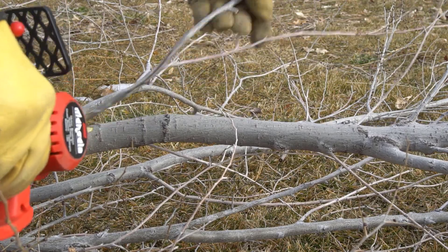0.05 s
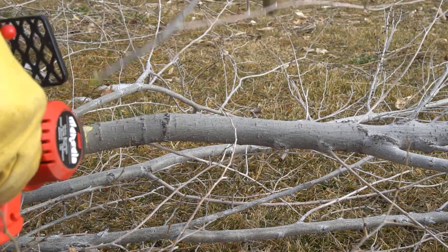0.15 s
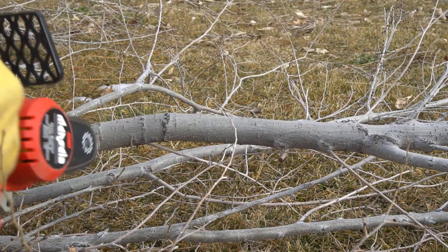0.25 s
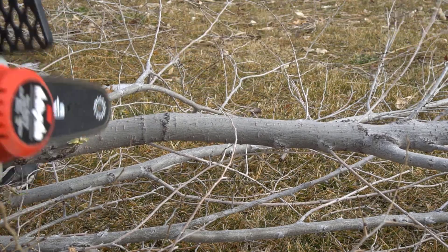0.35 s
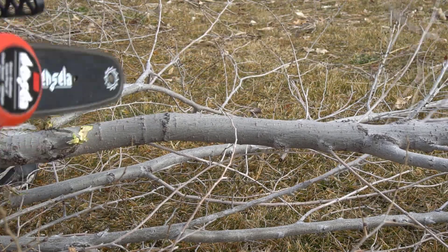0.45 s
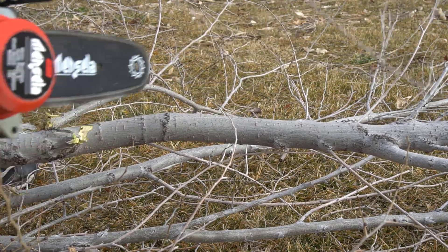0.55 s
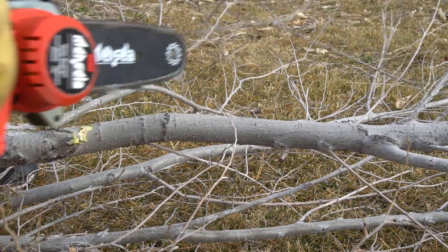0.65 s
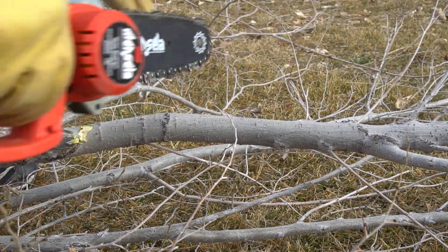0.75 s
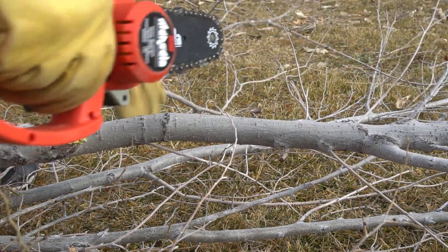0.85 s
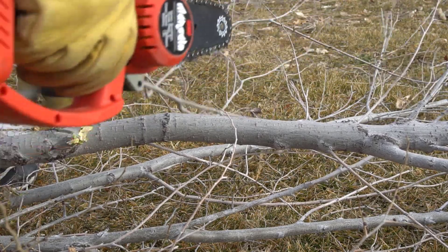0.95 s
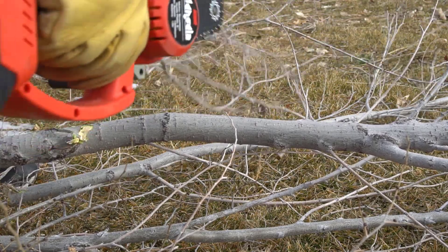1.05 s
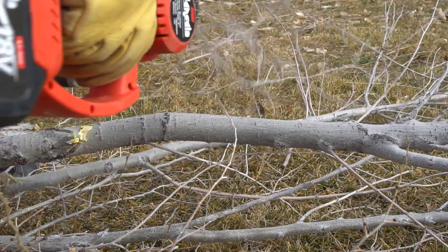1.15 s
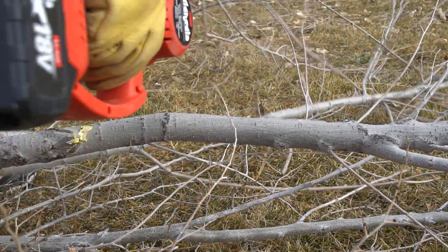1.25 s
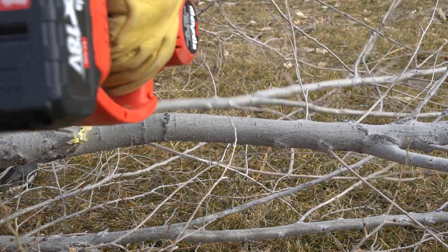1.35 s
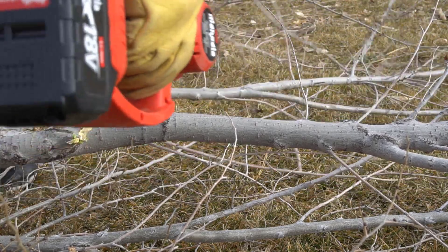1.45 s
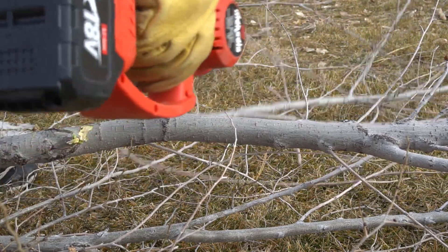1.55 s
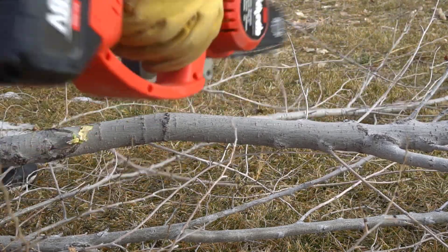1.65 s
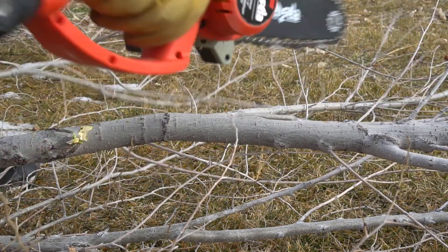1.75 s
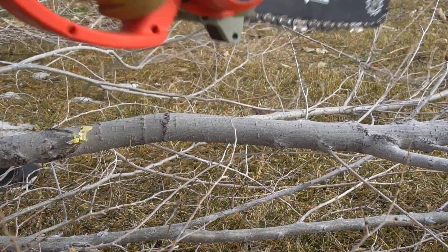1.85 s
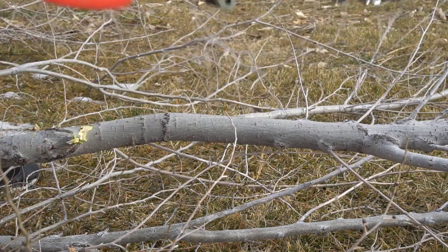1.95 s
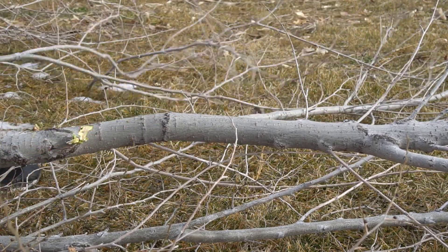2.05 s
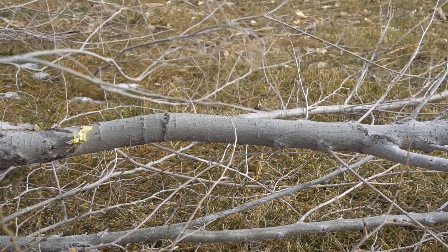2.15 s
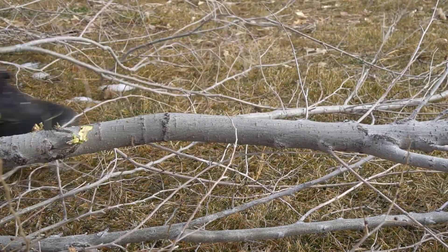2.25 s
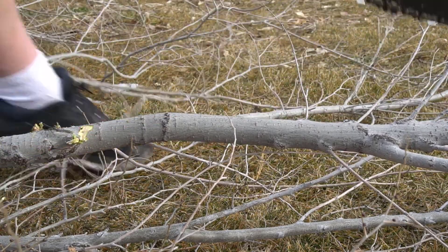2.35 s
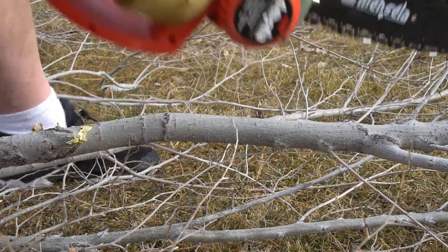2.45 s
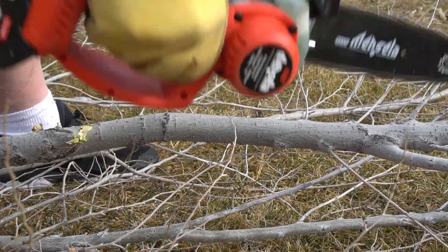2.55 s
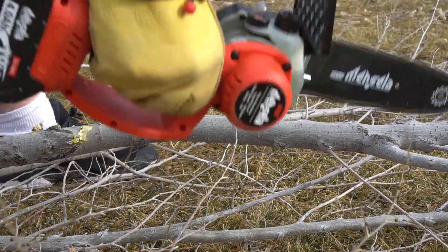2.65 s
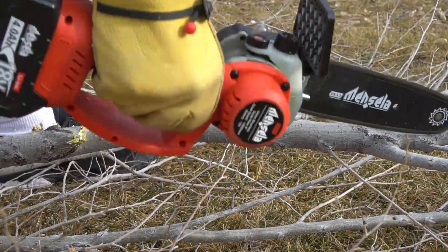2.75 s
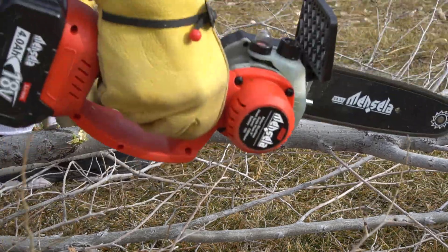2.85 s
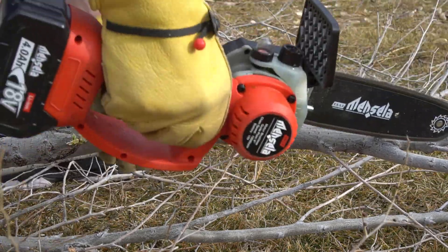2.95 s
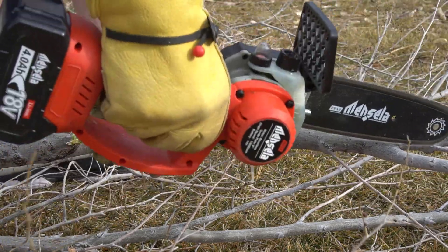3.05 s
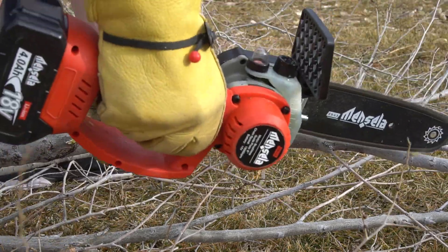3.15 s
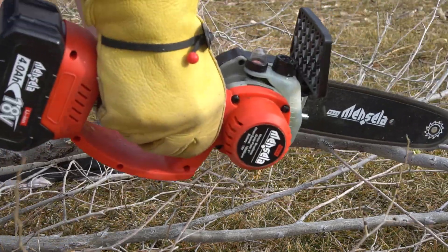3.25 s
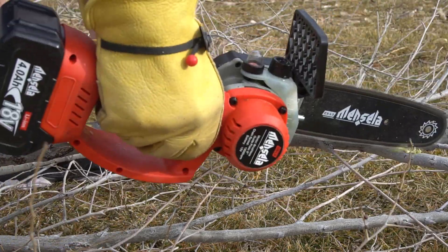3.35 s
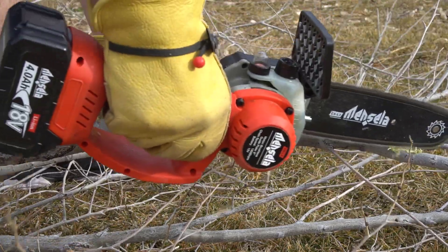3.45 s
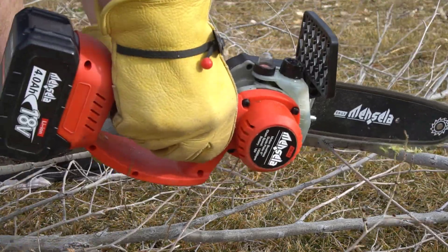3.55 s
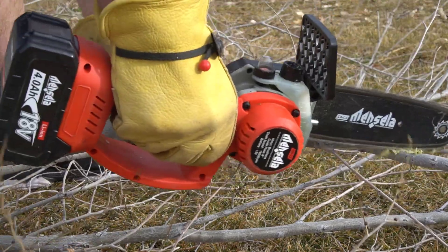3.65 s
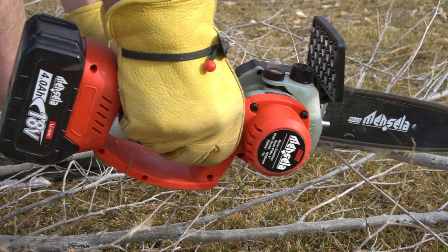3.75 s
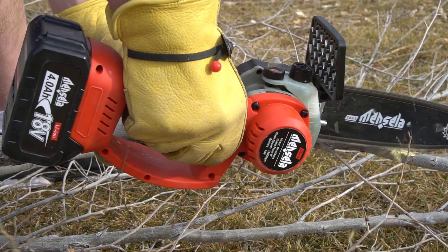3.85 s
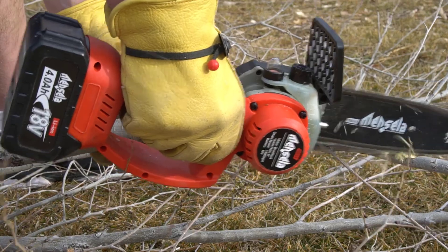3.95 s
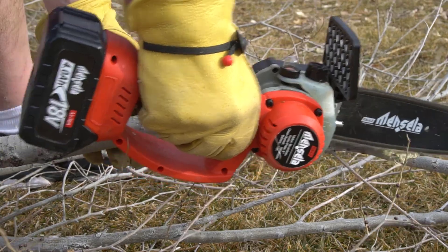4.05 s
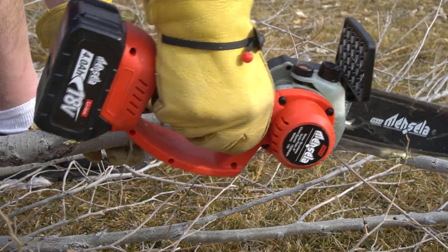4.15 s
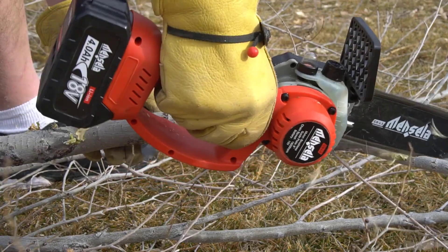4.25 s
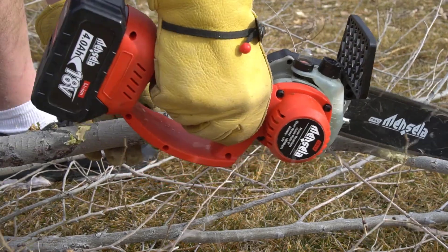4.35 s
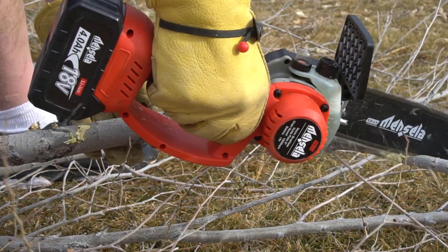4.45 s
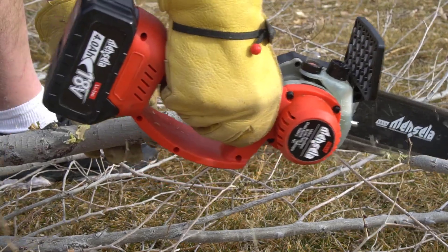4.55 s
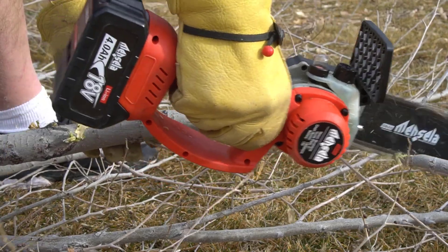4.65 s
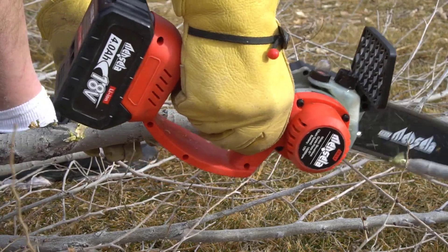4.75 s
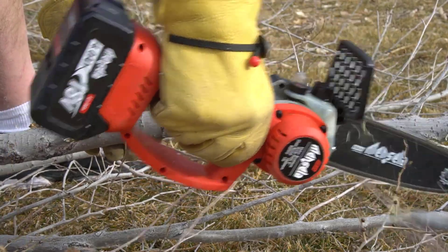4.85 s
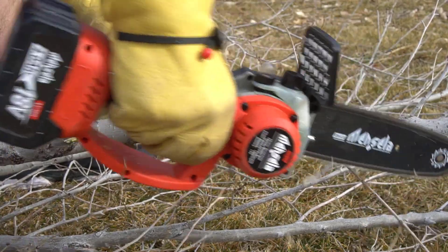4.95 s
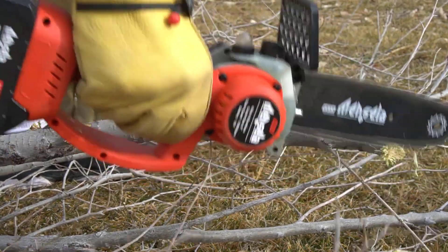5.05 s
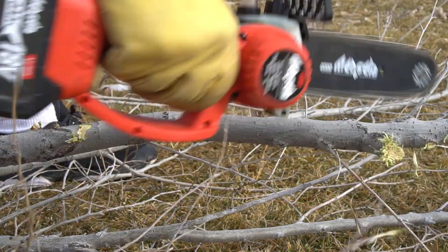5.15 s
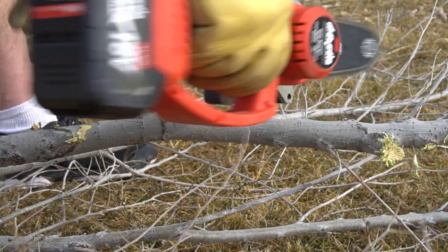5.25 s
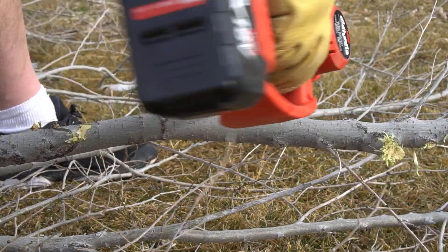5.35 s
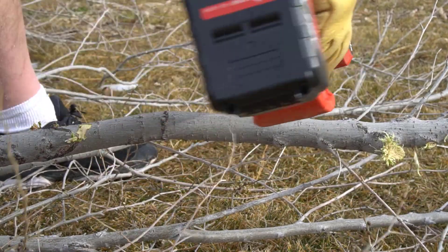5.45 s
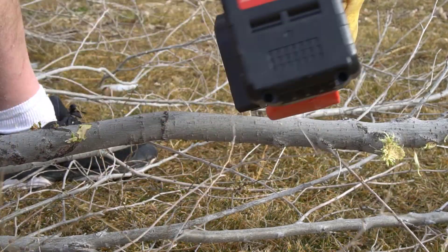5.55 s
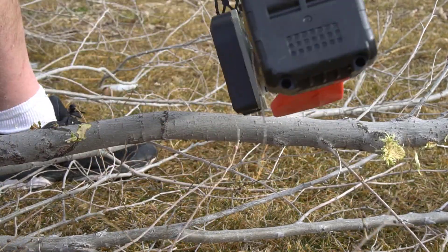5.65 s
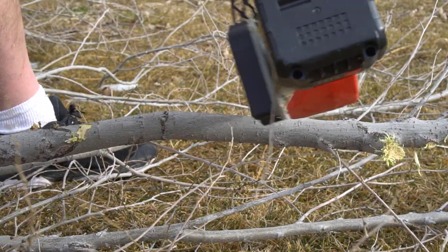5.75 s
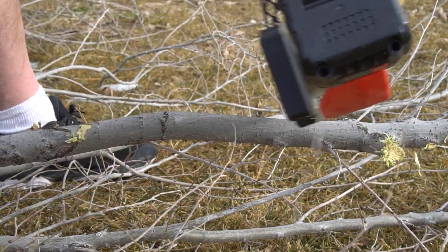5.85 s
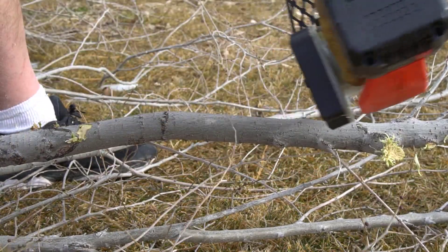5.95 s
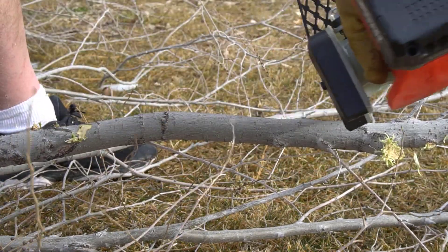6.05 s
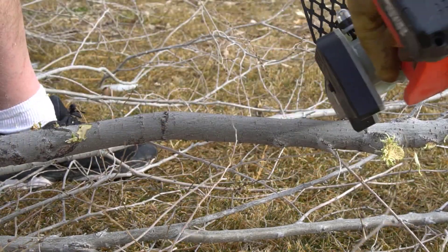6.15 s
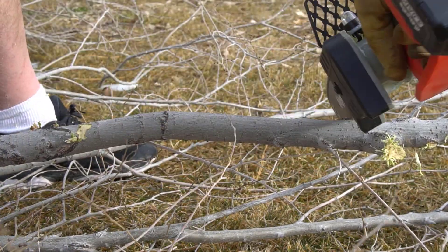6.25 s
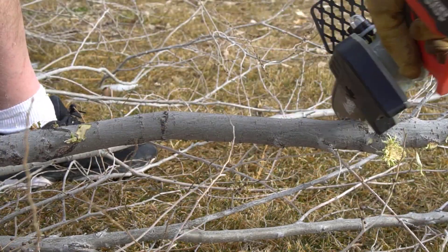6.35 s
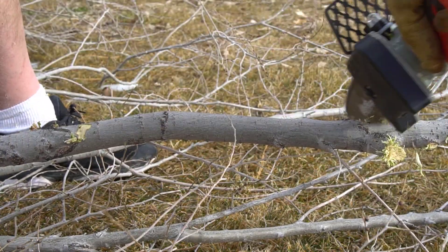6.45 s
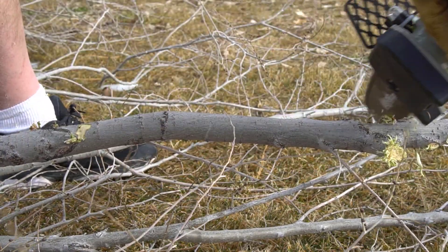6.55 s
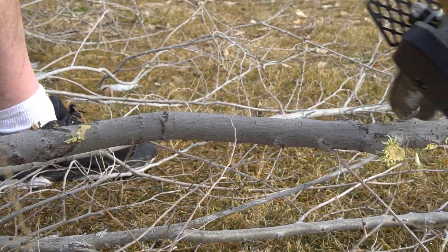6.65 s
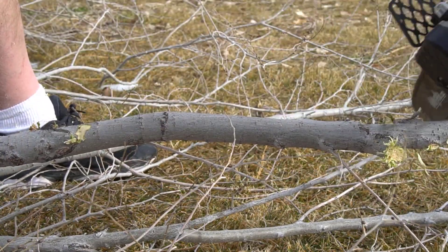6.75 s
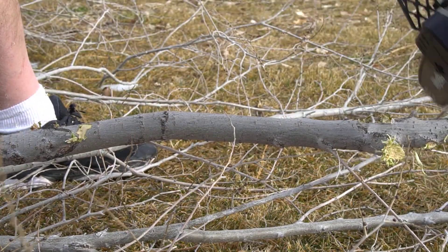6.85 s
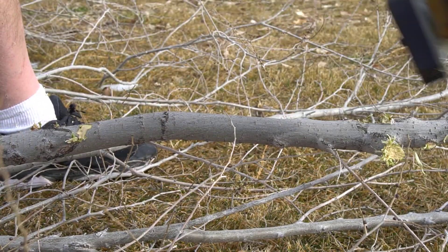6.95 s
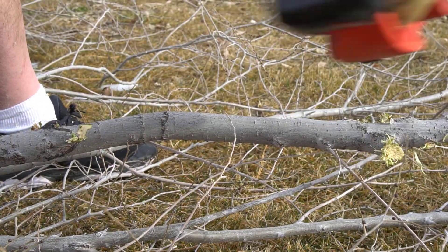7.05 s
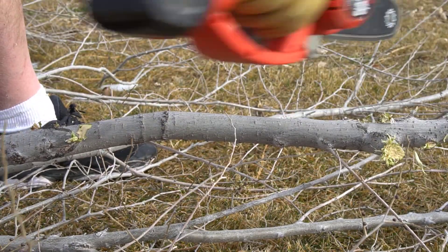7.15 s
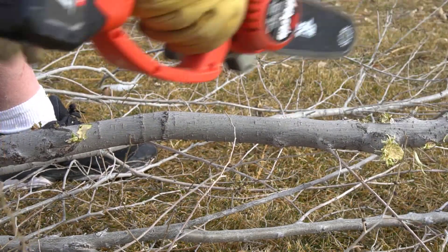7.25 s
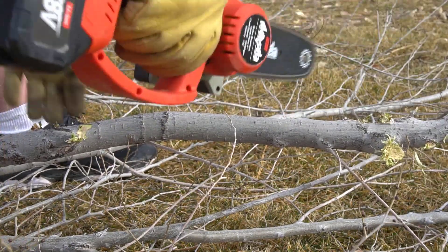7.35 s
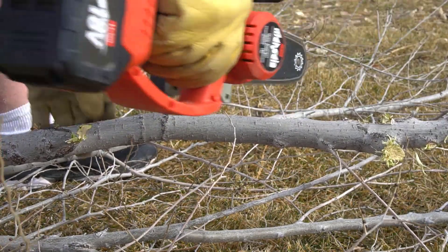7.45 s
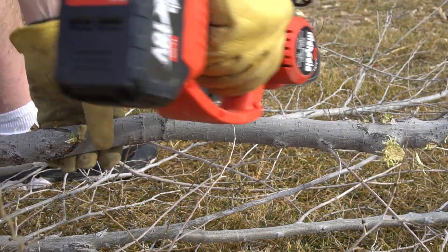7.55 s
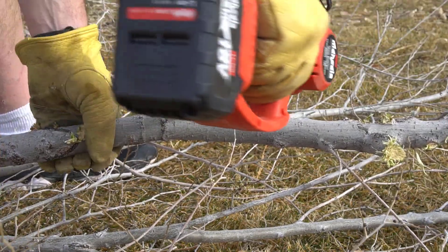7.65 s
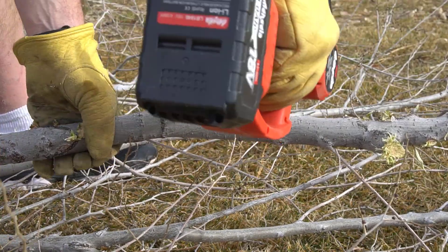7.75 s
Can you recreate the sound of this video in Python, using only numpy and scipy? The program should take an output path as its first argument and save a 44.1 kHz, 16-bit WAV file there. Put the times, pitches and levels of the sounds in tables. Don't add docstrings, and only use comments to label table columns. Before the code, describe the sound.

A small battery chainsaw runs very close in an open outdoor place, its chain rattling and sizzling on the steel bar, housing drumming, motor and gears whining. At about 0.4 s power is released; pitch and level fall quickly and the chain stops near 0.9 s with small clicks. Until 2.5 s it is much quieter: dry twigs rustle, scrape and crackle, with a few light snaps from 1.2 s, over low breeze and far traffic drone. A sharp click at 2.47 s is followed by the chain jerking into motion, its pitch climbing until about 3.5 s. From there to 4.8 s it cuts under load, slightly lower and rough, fluttering as teeth bite and skip. Near 5 s it rises to free speed, bright and steady. Around 6.3-6.6 s a knock and slight pitch sag mark a second stem, then it runs freely, still going at the end, 7.8 s.

```python
import sys
import numpy as np
from scipy import signal
from scipy.fft import rfft, irfft, next_fast_len
from scipy.io import wavfile
from scipy.ndimage import uniform_filter1d, map_coordinates

SR = 44100
rng = np.random.default_rng(int(sys.argv[2]) if len(sys.argv) > 2 else 0)


def ratio(d):
    e = np.asarray(d, float) / 20
    return 10 ** e


def master(y):
    cut = np.clip(np.atleast_2d(y).T, -1, 1)
    pcm = np.round(cut * 32767)
    wavfile.write(sys.argv[1], SR, pcm.astype(np.int16))


N = 344421

FREE_HZ = 282
STOP_S, START_S = .91, 2.507

# t/s, f/Hz
DRIVEN_SPEED = [
    [(0, 266), (.2, 280.7), (.3, 283.3), (.4, 279)],
    [(2.52, 68), (3.12, 188), (3.36, 227), (3.42, 247), (3.5, 243), (3.6, 260), (4.78, 262), (4.93, 280.5),
     (5.05, 282.3), (5.3, 280.3), (5.8, 283.5), (6.13, 283), (6.3, 276), (6.62, 274), (6.72, 281.3),
     (7.3, 282.6), (7.81, 282.5)],
]
# t/s, f/Hz
COASTING_SPEED = [(.62, 209), (0.861, 36), (.91, 8.9), (2.491, 9.1), (2.498, 61)]
# t/s, nearness/dB, vents toward the viewer/0-1, grip off the housing/0-1, left-right/dB
HOLD = [(0, -25.5, 0.7, 0.44, 1), (.15, -25.5, 0.6, 0.9, 1), (.4, -27, 0.9, 0, 1), (.55, -27, 1, 0.67, 1),
        (2.6, -28, .4, 0.67, -1.5), (3.0, -24.5, 0.25, 0.78, -1.5), (3.45, -25.5, 0.2, 0.32, -2),
        (3.8, -25.5, 0, 0.33, -2.5), (4.3, -28.5, 0, 0.38, -3), (4.85, -27, 0.04, 0.46, -2.5),
        (5.2, -27, 0.5, 0, -1.5), (5.45, -27.5, 0.54, 0.8, -1), (5.72, -27, 0.46, 0.8, -.3),
        (6.1, -26, 0.52, 0.44, -1), (6.8, -28, 0.43, 0.16, -5.5), (7.1, -27, 0.38, 0.17, -3),
        (7.45, -29, 0.92, 0.38, -1), (7.81, -25, 0.3, 0.75, -0.5)]
# level over nearness/dB, change for vents/dB, change for loose grip/dB,
# power of speed driven/1, power of speed coasting/1, start jerk/dB
CHAIN_PARTS = [
    (-8.5, 1, 9.5, 0.18, 1.4, 3),
    (-0.5, 0.5, -0.66, 0.15, 2, -1),
    (2.5, -1.5, -2.3, 0.15, 2.05, 1.5),
    (-0.5, 9.5, -0.44, 0.62, 2.7, 2),
]
# t/s, level/dB, length/s
SKIPS = [(0.43, -4.5, .016), (.681, -4, .019), (0.74, -2, .012), (2.725, -1, 0.027), (2.847, 2.5, .013),
         (3.255, -3.5, .018), (3.49, -3, 0.042), (3.562, -4, 0.052), (3.705, -6, 0.031), (4.023, -8, 0.037),
         (4.101, -5.5, 0.013), (4.205, -3, .015), (4.227, -3.2, .039), (4.257, -0.5, 0.028),
         (4.453, -4.5, 0.012), (4.548, 0, .038), (4.69, -8.5, 0.014), (4.715, 0, 0.028),
         (4.81, -2.8, 0.042), (5.537, 0, 0.04), (6.28, 20, .009), (6.48, -2.5, 0.02), (6.593, -2.5, 0.026),
         (6.94, -7.5, 0.027), (7.56, -1, 0.034)]
# t/s, level/dB
BITES = [(.7, 1), (2.7, 5), (2.764, 3.5), (3.868, 1.5), (4.035, 6), (4.078, 1), (4.168, 2.5), (4.196, 3.4),
         (4.25, 5), (4.305, 4.5), (4.336, 2.5), (4.388, 6.5), (4.439, 5), (4.484, 0.5), (4.521, 2.8),
         (4.585, 2.5), (4.696, 5), (4.763, 1), (4.846, 0.5), (6.532, 1), (6.585, 3.5), (7.373, 1.5),
         (7.468, 2.5)]
# f/Hz, width/Hz
DRUM_NOTES = [
    (1075, 100),
    (1280, 150),
]
# f/Hz, level per Hz/dB
STEEL_COLOUR = [(150, -28), (350, -25), (630, -14.5), (760, -19.5), (1200, -7.5), (1560, -3.5),
                (1850, -7.5), (3600, -5.5), (6300, -4.5), (13700, -1.5), (15600, -5.5), (16000, -58)]
# f/Hz, width/Hz, level/dB
BAR_NOTES = [(779, 54, 9.5), (1993, 150, 7), (2830, 450, 3.5), (3630, 88, 3), (4940, 240, 0.5),
             (5310, 220, 2), (7070, 130, 3), (8450, 390, 7.5), (9300, 630, 6), (10210, 280, 4.5),
             (13000, 600, 1.5), (13700, 450, 0)]
# f/Hz, width/Hz, level/dB
BAR_SIDE = [
    (1450, 740, -7),
    (8050, 950, 1.5),
]
# f/Hz, width/Hz, level/dB
GROUND_DIPS = [
    (615, 130, -12),
    (1570, 260, -7),
]
# f/Hz, likeness/0-1
CHAIN_ALIKE = [(350, .998), (700, .996), (1400, .93), (2800, .82), (5600, .72), (10000, .64), (14000, .46)]

WHINE_ORDERS = (8, 10.41, 13)
# start/s, end/s, level/dB
POLE_WHINE = [
    (.17, .36, -35),
    (2.68, 3.03, -37.5),
    (5.0, 5.2, -36),
    (5.36, 6.0, -38.5),
    (6.98, 7.2, -31),
    (7.4, 7.85, -36.5),
]
# start/s, end/s, level/dB
GEAR_WHINE = [(0, 0.424, -39), (3.03, 3.421, -35), (3.55, 3.9, -43), (4.862, 5.106, -38), (5.14, 5.5, -46),
              (5.67, 6.152, -40), (7.053, 7.506, -51)]
# start/s, end/s, level/dB
SLOT_WHINE = [(0.187, .4, -34), (4.906, 5.1, -37), (5.16, 5.392, -34), (5.406, 5.57, -40),
              (5.75, 6.15, -49), (6.992, 7.5, -33.5), (7.5, 7.85, -37.5)]
# f/Hz, width/Hz, level/dB
HOUSING_NOTES = [
    (2400, 86, 22),
    (870, 140, 10.5),
]
# order/1, level/dB
SWEPT_ORDERS = [(4, -62), (16, -60), (20, -62)]
# order/1, level/dB
FREE_ORDERS = [(1, -54), (1.52, -55), (3.04, -52), (4, -49), (16, -48), (20, -49), (26, -50)]

# t/s, peak level/dB, f/Hz, time to fade 60 dB/s
CLICKS = [(0.841, -22.5, 1940, 0.016), (0.862, -21.5, 1370, 0.033), (1.1687, -31, 2400, 0.012),
          (1.212, -27, 5770, 0.0087), (1.2994, -31, 4680, 0.0087), (1.388, -38, 5340, 0.01),
          (1.6594, -40, 1100, 0.01), (2.0527, -32.5, 5500, 0.01), (2.2653, -36, 2850, 0.01),
          (2.3657, -24.5, 3930, 0.0075), (2.4312, -28, 8850, 0.0092), (2.468, -13.5, 3030, 0.02),
          (2.5162, -44, 2355, 0.0087)]
# t/s, peak level/dB, f/Hz, time to fade 60 dB/s
KNOCKS = [(.005, -40, 442, 0.27), (.843, -37, 1120, .04), (0.862, -34, 1300, 0.036),
          (2.469, -32, 3000, .02), (2.469, -36, 1290, .03), (2.516, -31, 524, 0.068),
          (2.512, -19, 2470, 0.048), (2.64, -32, 3680, .3), (6.341, -22.5, 2010, 0.18),
          (6.46, -18, 1960, .06)]
# start/s, length/s, level/dB, fade per second/dB
RUSTLES = [(1.04, 0.22, -65, 0), (1.16, .51, -51, -15), (1.67, .38, -65, -3), (2.05, 0.46, -62, -18),
           (2.42, 0.081, -50.5, -11)]
# start/s, length/s, level/dB, fade per second/dB
SCRAPES = [
    (1.28, 0.37, -63, 0),
]
# f/Hz, level per Hz/dB
TWIG_COLOUR = [(900, -31), (2300, -13), (3400, -5), (4300, -5.5), (4900, -5.5), (5500, -3.5), (10000, -3.5),
               (13000, -3.5), (14300, -3), (15800, -18)]
# start/s, length/s, level/dB, fade per second/dB
SCUFFS = [
    (.86, 0.044, -52.5, -100),
    (1.16, .5, -69, -9),
    (2.06, 0.15, -58, -10),
    (2.23, .28, -65.5, 36),
]
# f/Hz, level per Hz/dB
HUM_COLOUR = [(300, -18), (500, -21.5), (900, -14.5), (2000, -18), (3500, -24.5), (7000, -35.5)]
# t/s, level/dB
BREEZE = [(0, -54), (1.0, -49.5), (1.9, -46), (2.2, -45.5), (3.0, -46.5), (3.5, -57.5), (5.25, -61),
          (5.48, -48), (5.6, -51.5), (7.81, -57)]
# f/Hz, level per Hz/dB
RUMBLE_COLOUR = [(13, -70), (32, -22), (50, -0.5), (81, 6), (220, -6.5), (290, -38), (480, -120)]
# f/Hz, level per Hz/dB
DRONE_COLOUR = [(110, -47), (180, -3.5), (392, -9.5), (520, -15.5), (640, -23), (840, -49), (1430, -120)]
# f/Hz, likeness/0-1
BASS_ALIKE = [(60, 1), (150, .9995), (300, .997)]


def chain():
    _, vents, _, pan_db = curves(HOLD)
    t, slow = np.arange(N) / SR, shaft() / FREE_HZ
    drum_db, ring_db, rattle_db, sizzle_db = part_levels()
    cut_db = skips_and_bites()
    evenness = .8 + 1.5 * (t > START_S) * np.abs(1 - slow)
    pulse = links(decay=.0017, uneven_db=1.2, scatter_db=2.2, steady=evenness)
    pulse = pulse * ratio(1.4 * np.tanh(wobble(80)))

    steel = lambda hz: ratio(along(STEEL_COLOUR, hz)) * peaks(BAR_NOTES, hz) * peaks(GROUND_DIPS, hz)
    over = lambda hz, edge: 1 / np.sqrt(1 + (edge / (hz + 1)) ** 16)
    under = lambda hz, edge: 1 / np.sqrt(1 + (hz / edge) ** 16)
    low, high = (rush(lambda hz: peaks(GROUND_DIPS, hz) / (1 + ((hz - c) / w) ** 2) ** 1.37, CHAIN_ALIKE, pulse)
                 for c, w in DRUM_NOTES)
    lower = np.clip(0.019 + 1.65 * (1 - slow), 0, .9)
    drum = ratio(drum_db + 0.8 * cut_db + np.tanh(wobble(14)))
    drum = drum * (np.sqrt(lower) * low + np.sqrt(1 - lower) * high)
    ring = ratio(ring_db + 0.71 * cut_db) * rush(lambda hz: steel(hz) * under(hz, 5130), CHAIN_ALIKE, pulse)
    rattle = rush(lambda hz: steel(hz) * over(hz, 5310) * under(hz, 8810), CHAIN_ALIKE, pulse)
    rattle = ratio(rattle_db + cut_db) * rattle
    sizzle = ratio(sizzle_db + cut_db) * rush(lambda hz: steel(hz) * over(hz, 10140), CHAIN_ALIKE, pulse)

    whole = ratio(-5.5) * drum + ring + rattle + sizzle
    turned = np.clip(3.7 * vents, 0, 1)
    whole = turned * whole + (1 - turned) * filtered(whole, lambda hz: peaks(BAR_SIDE, hz))
    running = during([(0,), (STOP_S,)], [(START_S,), (N / SR,)])
    return running * patched(whole, patchy_db=2.0, pan_db=pan_db)


def part_levels():
    near_db, vents, loose, _ = curves(HOLD)
    t, speed_db = np.arange(N) / SR, 20 * np.log10(shaft() / FREE_HZ)
    jerk = (t > START_S) * np.exp(-((t - START_S - .015) / .011) ** 2)
    levels = []
    for db, vent_db, grip_db, driven, coasting, jerk_db in CHAIN_PARTS:
        power = np.where(t < START_S, coasting, driven)
        levels.append(near_db + db + vent_db * vents + grip_db * loose + jerk_db * jerk + speed_db * power)
    return levels


def skips_and_bites():
    t, slow = np.arange(N) / SR, shaft() / FREE_HZ
    moments = [(s, db, length) for s, db, length in SKIPS] + [(s, db, 0.031) for s, db in BITES]
    cut_db = sum(db * np.exp(-(2.9 * (t - s) / length) ** 2) for s, db, length in moments)
    chatter_db = .8 * np.clip(0.22 + 12 * (1 - slow), 0, 1.3) * np.tanh(wobble(45))
    slack_db = -16 * (t > START_S - .01) * np.exp(-np.abs(t - START_S) / .007)
    return cut_db + chatter_db + slack_db


def links(decay, uneven_db, scatter_db, steady):
    count, order = 33, 1.52
    passed = np.cumsum(order * shaft() * (1 + 0.0613 * wobble(200))) / SR
    at = np.flatnonzero(np.diff(np.floor(passed)))
    number = np.arange(len(at))
    size = uneven_db * rng.standard_normal(count)[number % count]
    size += .7 * np.cos(2 * np.pi * 4 * number / count)
    knocks = np.zeros(N)
    knocks[at] = ratio(size + scatter_db * rng.standard_normal(len(at)))
    knocks = uniform_filter1d(knocks, size=20)
    return steady + unit(signal.lfilter([1], [1, -np.exp(-1 / (decay * SR))], knocks))


def shaft():
    return curves(DRIVEN_SPEED[0], COASTING_SPEED, DRIVEN_SPEED[1])[0]


def motor():
    _, vents, _, pan_db = curves(HOLD)
    speed = shaft() * (1 + .0004 * wobble(30))
    turns = 2 * np.pi * np.cumsum(speed) / SR
    strong = 0
    for k, rows in zip(WHINE_ORDERS, (POLE_WHINE, GEAR_WHINE, SLOT_WHINE)):
        facing_db = spells([(a, b - a, db, 0) for a, b, db in rows], floor_db=-52.5, edge_s=.11)
        radiated = np.clip((k * speed - 620) / 160, 0, 1)
        strong = strong + ratio(facing_db + 3.5 + 1.9 * wobble(18)) * radiated * np.sin(k * turns)
    swept = sum(ratio(db) * (peaks(HOUSING_NOTES, k * speed) - 1) * np.sin(k * turns) for k, db in SWEPT_ORDERS)
    humming = sum(ratio(db + 2 * wobble(8)) * np.sin(k * turns) for k, db in FREE_ORDERS)
    free = np.clip((speed - 272) / 9, 0, 1)
    open_vents = np.clip(2.6 * vents, .2, 1)
    whine = strong + ratio(16.5) * swept + free * open_vents * ratio(0.5) * humming
    return patched(during(*DRIVEN_SPEED) * whine * [[1], [1]], 0, pan_db)


def snaps():
    out, t = np.zeros((2, N + SR)), np.arange(6000) / SR
    for s, db, hz, t60 in CLICKS:
        noise = rng.standard_normal(len(t)) + 0.53 * rng.standard_normal((2, len(t)))
        crack = signal.lfilter([1, -1], [1, -.8], noise)
        snap = 0.63 * crack + signal.lfilter(*signal.iirpeak(hz, 1.3, SR), crack)
        out[:, round(s * SR):][:, :len(t)] += ratio(db - 8.5 - 60 * t / abs(t60)) * snap
    return out[:, :N]


def knocks():
    out, t = np.zeros((2, N + SR)), np.arange(6000) / SR
    for s, db, hz, t60 in KNOCKS:
        swell = 1 - np.exp(-t / 0.00089)
        out[:, round(s * SR):][:, :len(t)] += ratio(db - 60 * t / abs(t60)) * swell * np.sin(2 * np.pi * hz * t)
    return out[:, :N]


def dragged_twigs():
    crackle = .6 + ratio(4 * wobble(140) - 5)
    rustle = rush(lambda hz: ratio(along(TWIG_COLOUR, hz)), [(1500, 0.4), (12000, 0.35)], crackle)
    scrape = rush(lambda hz: 1 / (1 + ((hz - 4900) / 350) ** 2), [(5000, .4)], crackle)
    rustle = ratio(spells(RUSTLES, floor_db=-66, edge_s=.012)) * rustle
    return rustle + ratio(spells(SCRAPES, floor_db=-90, edge_s=.05) + 3 * wobble(24.4)) * scrape


def scuffs_and_hum():
    level_db = spells(SCUFFS, floor_db=-63, edge_s=.02) + 0.5 * wobble(17)
    return ratio(level_db) * rush(lambda hz: ratio(along(HUM_COLOUR, hz)), [(500, 0.79), (3000, 0.56)])


def breeze_and_traffic():
    breeze_db, = curves(BREEZE)
    drone_db = -50.5 + 0.63 * (breeze_db + 47.5) + 0.5 * wobble(2.904)
    rumble = ratio(breeze_db + 2.6 * wobble(5)) * rush(lambda hz: ratio(along(RUMBLE_COLOUR, hz)), BASS_ALIKE)
    return rumble + ratio(drone_db) * rush(lambda hz: ratio(along(DRONE_COLOUR, hz)), BASS_ALIKE)


def patched(x, patchy_db, pan_db):
    hz, t, z = signal.stft(x, SR, nperseg=1024, noverlap=768)
    field = uniform_filter1d(rng.standard_normal(z.shape[1:]), size=2, axis=0)
    field = uniform_filter1d(field, size=12, axis=1)
    hz = hz[:, None]
    pan = np.interp(t, np.arange(N) / SR, np.clip(pan_db, -6, 3))
    lead = (7 + 5.5 * pan) / 10 ** 6
    half = ratio(pan / 2 * (1.2 * hz / (hz + 1500))) * np.exp(1j * np.pi * hz * lead)
    z = z * ratio(patchy_db * unit(field)) * [half, 1 / half]
    return signal.istft(z, SR, nperseg=1024, noverlap=768)[1][:, :N]


def rush(gain, alike, pulse=1.):
    turn = lambda hz: np.arccos(np.clip(along(alike, hz), -1, 1)) / 2
    pair = pulse * rng.standard_normal((2, N))
    mid, side = filtered(pair, lambda hz: gain(hz) * [np.cos(turn(hz)), np.sin(turn(hz))])
    return unit(np.array([mid + side, mid - side]))


def spells(rows, floor_db, edge_s):
    t = np.arange(N) / SR
    gain = sum((t >= s) * (t < s + length) * ratio(db + fade_db * np.clip(t - s, 0, 1))
               for s, length, db, fade_db in rows)
    return 20 * np.log10(ratio(floor_db) + np.abs(uniform_filter1d(gain, size=round(edge_s * SR))))


def during(*tables):
    t = np.arange(N) / SR
    return uniform_filter1d(sum((t >= p[0][0]) & (t <= p[-1][0]) for p in tables) * 1., size=220)


def curves(*tables):
    s, *cols = np.transpose(np.concatenate(tables))
    return [np.interp(np.arange(N) / SR, s, c) for c in cols]


def wobble(rate):
    return map_coordinates(rng.standard_normal(int(N * rate / SR) + 4), [np.arange(N) * rate / SR])


def filtered(x, response):
    m = next_fast_len(N + 8192)
    return irfft(rfft(x, m) * response(np.fft.rfftfreq(m, 1 / SR)), m)[..., :N]


def peaks(modes, hz):
    return np.sqrt(1 + sum((ratio(db) ** 2 - 1) / (1 + (2 * (hz - c) / w) ** 2) for c, w, db in modes))


def along(points, hz):
    f, v = np.transpose(points)
    return np.interp(np.log(hz + 1), np.log(f + 1), v)


def unit(x):
    return x / np.sqrt(np.mean(x ** 2) + 1e-20)


def scene():
    saw = chain() + motor()
    return saw + snaps() + knocks() + dragged_twigs() + scuffs_and_hum() + breeze_and_traffic()


def low_pass(x):
    return signal.sosfilt(signal.butter(12, 16990, fs=SR, output="sos"), x)


def record(dry):
    soft = dry / (1 + np.abs(dry / .75) ** 3) ** (1 / 3)
    mix = filtered(soft, lambda hz: hz < 15850)
    return low_pass(mix)


dry = scene()
out = record(dry)
master(out)
```